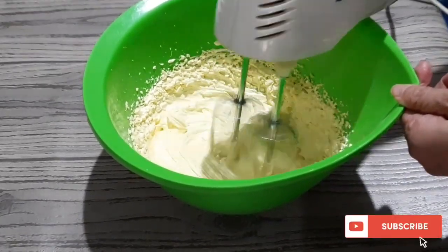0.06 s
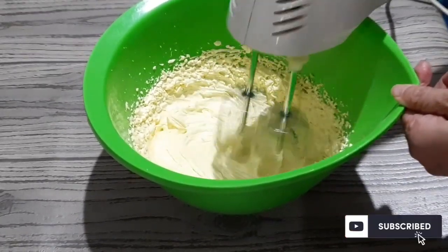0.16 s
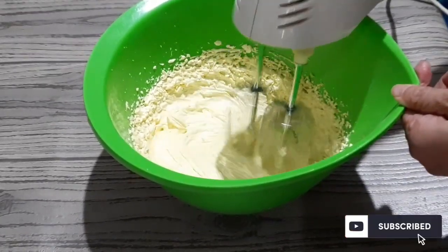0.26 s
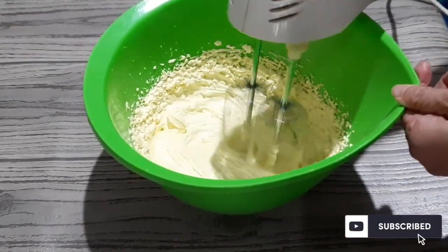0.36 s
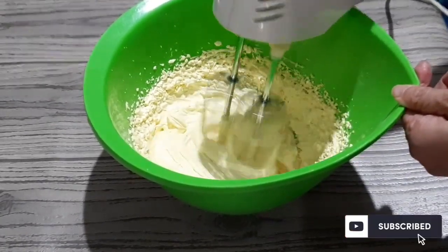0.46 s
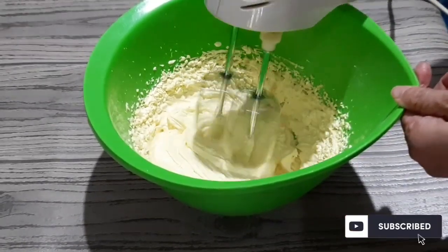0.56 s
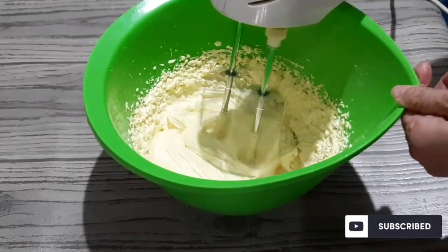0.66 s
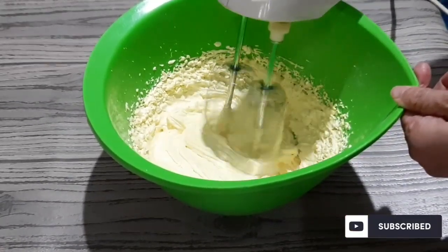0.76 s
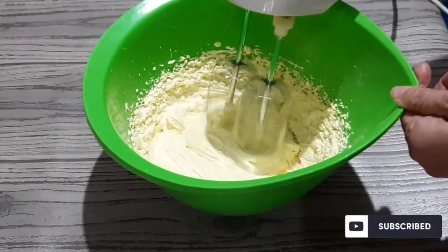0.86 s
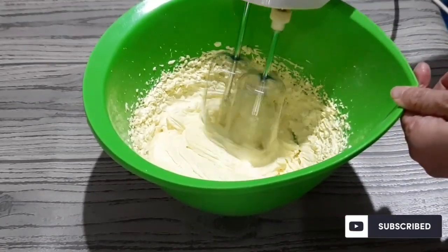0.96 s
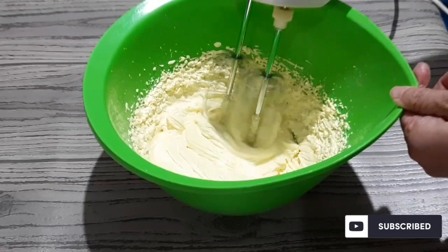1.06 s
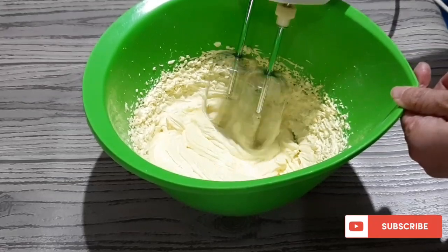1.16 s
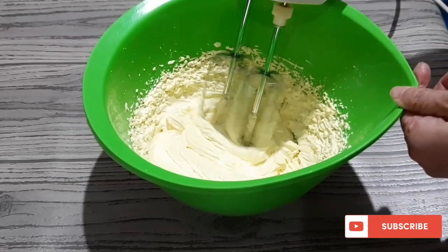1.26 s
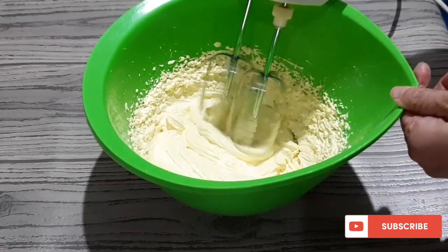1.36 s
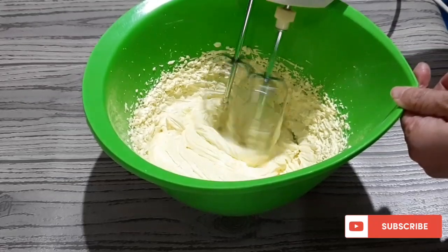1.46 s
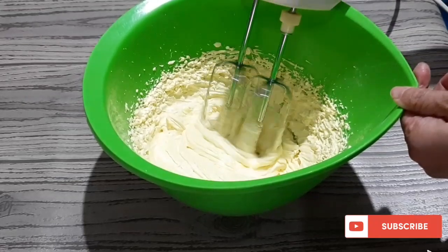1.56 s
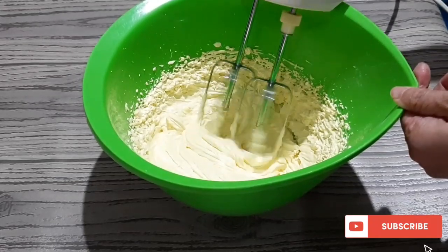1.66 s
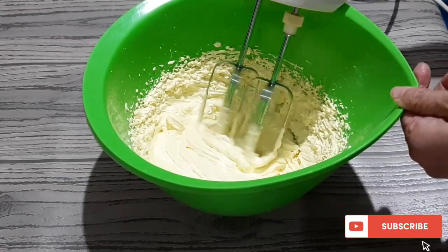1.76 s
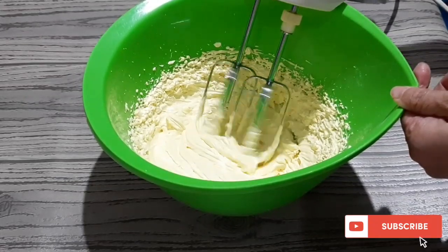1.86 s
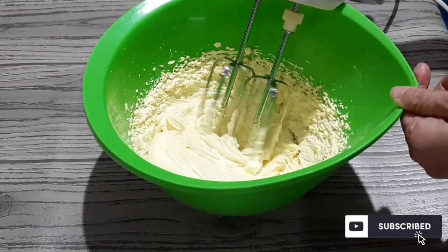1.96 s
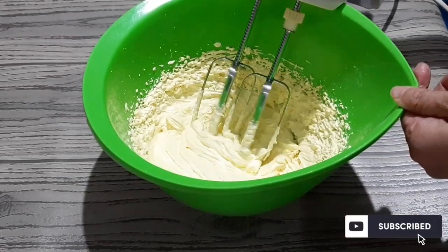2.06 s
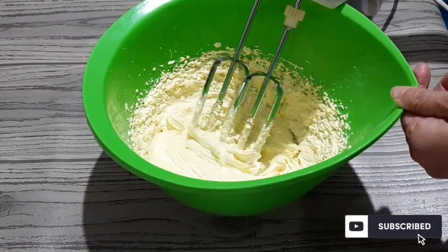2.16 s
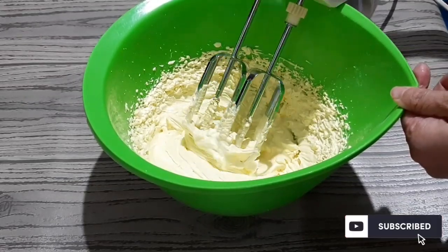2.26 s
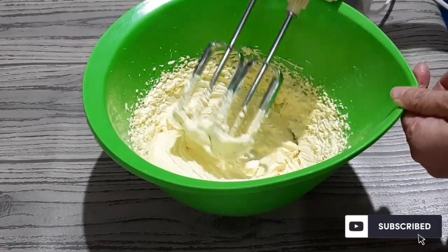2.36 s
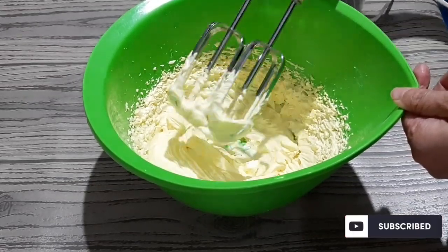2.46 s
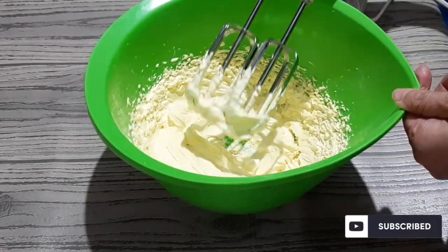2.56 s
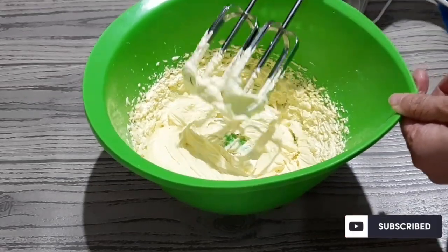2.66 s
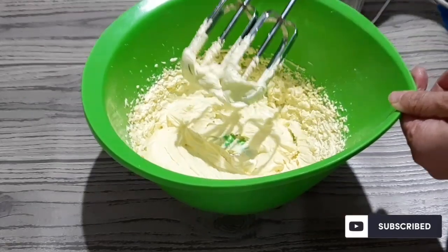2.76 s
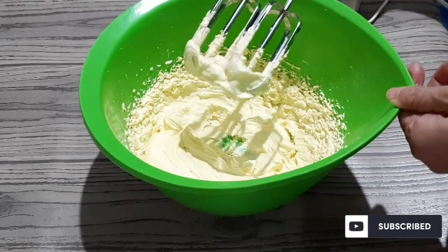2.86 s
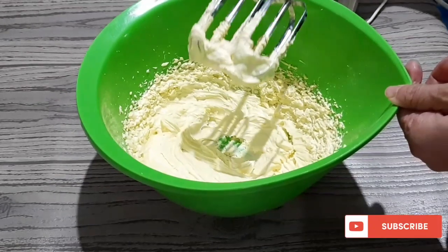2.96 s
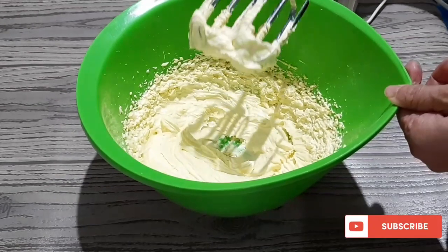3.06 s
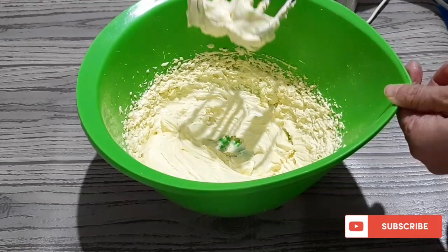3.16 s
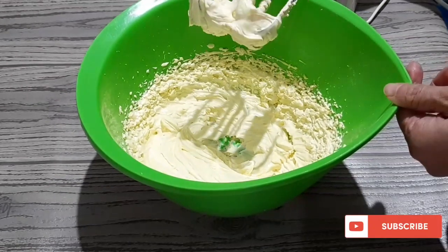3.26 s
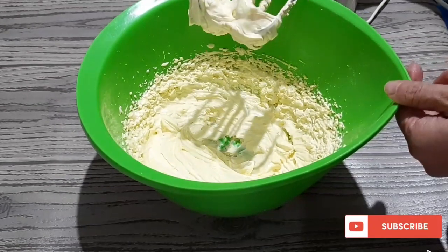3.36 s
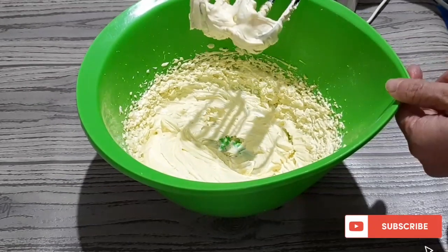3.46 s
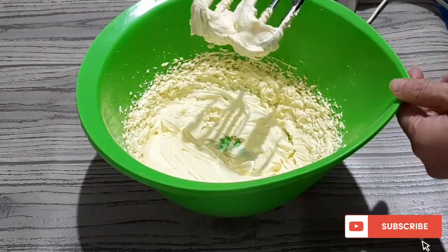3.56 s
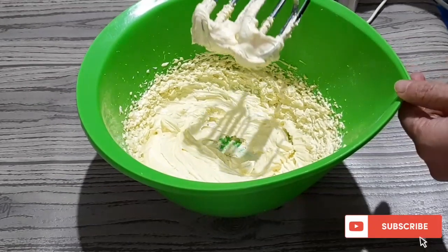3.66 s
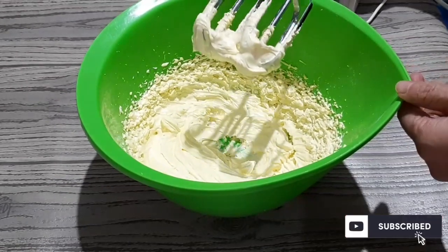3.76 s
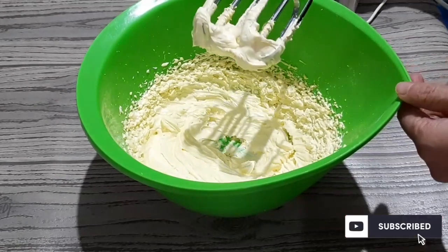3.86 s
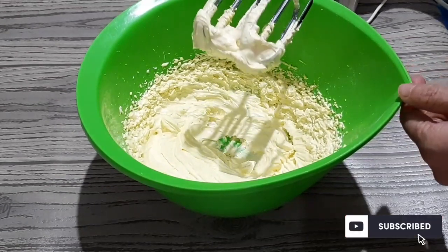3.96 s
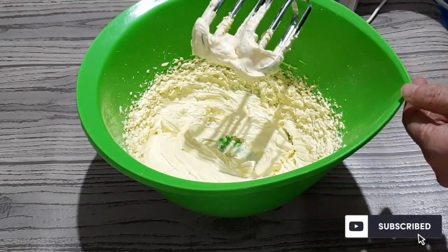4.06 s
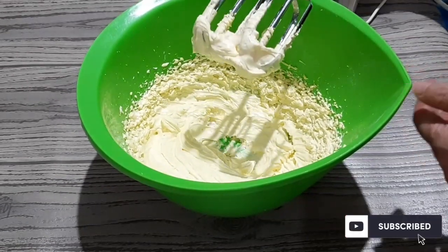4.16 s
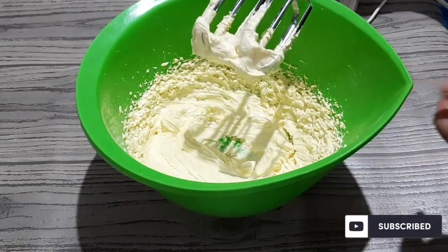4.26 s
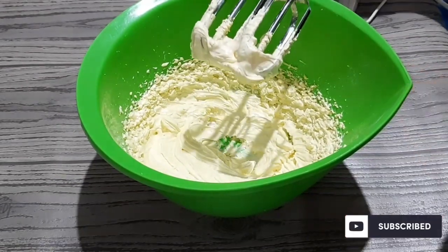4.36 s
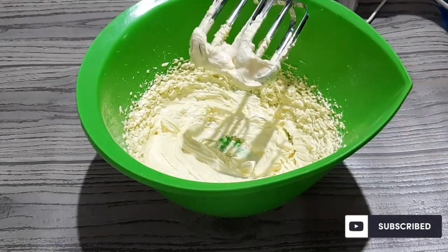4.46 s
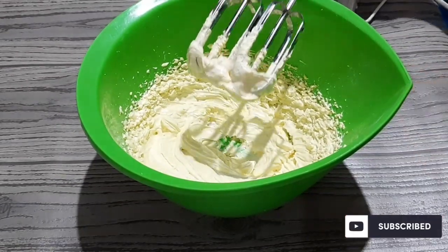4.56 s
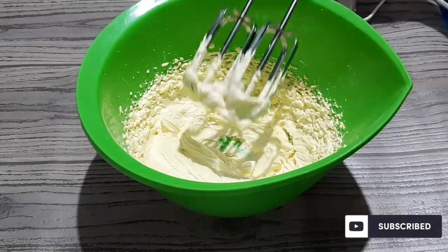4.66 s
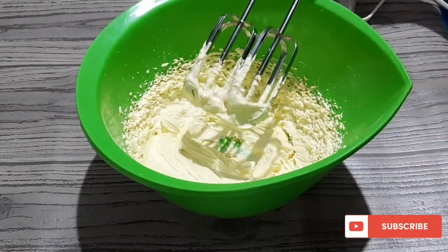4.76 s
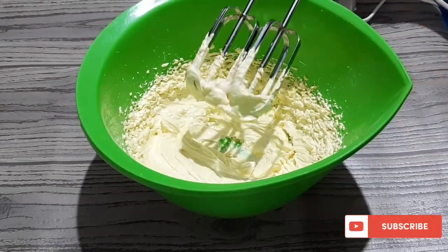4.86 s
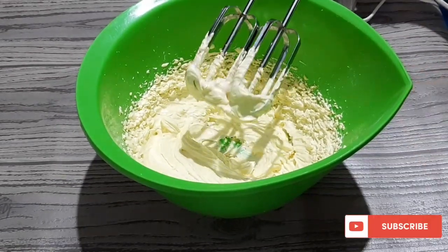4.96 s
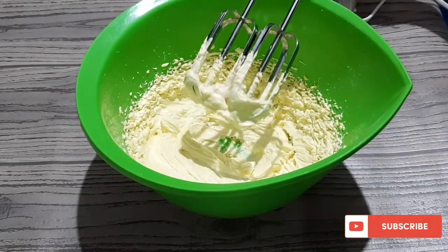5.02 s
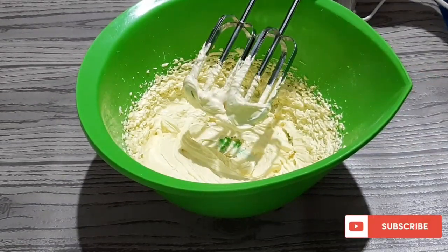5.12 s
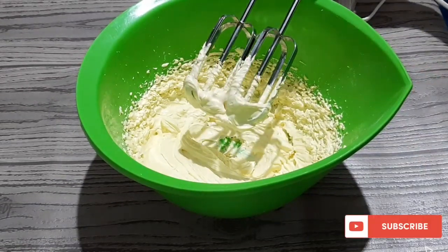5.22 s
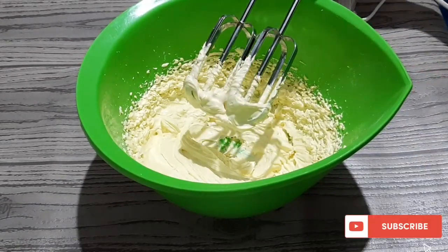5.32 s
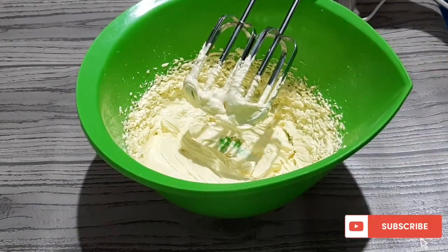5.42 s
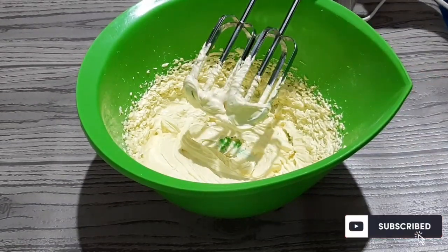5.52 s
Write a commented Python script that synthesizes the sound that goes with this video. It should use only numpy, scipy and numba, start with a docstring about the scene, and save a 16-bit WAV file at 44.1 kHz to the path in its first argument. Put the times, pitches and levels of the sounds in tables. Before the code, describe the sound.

A hand mixer already running at full speed rattles and hisses in a plastic bowl of batter, its blades drumming the wall. After about half a second it is switched off and its whine glides down over more than a second, knocks thinning out. Then the bowl ticks and creaks, and the mixer is set down with small thumps. Close phone microphone, quiet kitchen with short echoes.

```python
"""A hand mixer runs in a plastic bowl of batter, is switched off and coasts to rest, close to a phone in a kitchen.
Its commutator whines as gliding sines; gears rattle as clicks through housing resonances; fan and brushes hiss.
Beater blades strike the bowl as decaying modes and drum on it, and beater wires ping.
Then the bowl creaks and ticks on the table as the beaters are lifted, and the mixer is set down with thumps.
Short echoes surround these sounds, over smooth kitchen air with hums."""
import sys
import numpy as np
from scipy import signal
from scipy.fft import rfft, irfft
from scipy.io import wavfile
from scipy.ndimage import uniform_filter1d
from numba import njit

SR = 44100
rng = np.random.default_rng(int(sys.argv[2]) if len(sys.argv) > 2 else 0)


def volts(x):
    """Linear amplitude factor 10**(x/20) for a level x in dB, scalar or array-like."""
    e = np.asarray(x, float) / 20
    return 10 ** e


def unload_audio(sound):
    """Save the sound as a 16-bit wav file, at the path given as the first command line argument."""
    columns = np.transpose(np.atleast_2d(sound))
    # keep every value between -1 and 1, then stretch to whole-number steps
    steps = np.round(np.clip(columns, -1, 1) * 32767)
    wavfile.write(sys.argv[1], SR, steps.astype(np.int16))


N = 246519
TIME = np.arange(N) / SR

FULL_HZ = 4003  # commutator bars per second at the start
PASSES_PER_S = 45  # mean rate of blade passes
LAST_KNOCK_HZ = 330  # commutator rate below which the blades are too slow to knock

# modes of the bowl, t60 before damping: f/Hz, level/dB, t60/s
BOWL_MODES = [(344, -8, 0.074), (423.8, -1, 0.066), (520, 4, 0.04), (624, 4, 0.036), (810, -1.5, 0.0091),
              (1130, 8.5, 0.025), (1400, 7.5, 0.013), (1925, 7, 0.017), (2310, -2.5, 0.059),
              (2920, 7, 0.014), (3800, 9, 0.0063), (4520, 8.5, 0.016), (5100, -15, 0.029),
              (7220, -1.5, 0.02)]
# beaters pressed on the bowl: t/s, pressure/dB
PRESSURE = [(0, -1), (.19, 1), (.205, 8), (.4, 9), (.51, 4.5), (.535, 2), (.8, 2), (1.06, 0.5), (1.43, 1.5),
            (1.62, 2), (1.8, -1), (1.97, 1), (2.1, -1)]
# a small bowl sends out little bass: f/Hz, gain/dB
BOWL_RADIATION = [(60, -13.5), (200, -8), (330, -6), (15000, 1)]


def level(x, db):
    """Scale to an rms level."""
    return x * volts(db) / np.sqrt(np.mean(x ** 2))


def colour(x, points):
    """Weigh the spectrum of a sound by f/Hz, gain/dB points."""
    hz, db = np.transpose(points)
    bins = np.fft.rfftfreq(N, 1 / SR) + 1
    return irfft(rfft(x) * volts(np.interp(np.log(bins), np.log(hz), db)), N)


def resonate(x, hz, width):
    """One fixed resonance, gain 1 at the centre."""
    return signal.lfilter(*signal.iirpeak(hz, hz / width, SR), x)


@njit
def wander(x, hz, width):
    """A resonance whose centre moves; gain 1 at the centre."""
    y, band, low = np.empty(len(x)), 0., 0.
    for i in range(len(x)):
        g, k = np.tan(np.pi * hz[i] / SR), width / hz[i]
        v = (band + g * (x[i] - low)) / (1 + g * (g + k))
        band, low, y[i] = 2 * v - band, low + 2 * g * v, k * v
    return y


def walk(rate):
    """Random levels held 1 / rate s and slewed twice; spread near 1."""
    k = int(SR / rate)
    held = np.repeat(rng.standard_normal(N // k + 1), k)
    return 1.8 * uniform_filter1d(uniform_filter1d(held, k), k)[:N]


def clicks(per_s, spread_db):
    """Random clicks, a few much larger than the rest."""
    size = np.minimum(rng.exponential(size=N), 3.)
    return (rng.random(N) < per_s / SR) * rng.choice([-1., 1.], N) * volts(spread_db * size)


def ring(x, modes, damp):
    """A steady excitation through modes; a longer ring is a narrower, taller peak."""
    out = np.zeros(N)
    for k, (hz, db, t60) in enumerate(modes):
        width = damp * np.log(1000) / np.pi / t60
        out += (-1) ** k * volts(db) * np.sqrt(t60) * resonate(x, hz, width)
    return out


def blows(events, modes, favour_db, neutral_db, soft_ms, damp, crack_db, crack_ms):
    """Each blow snaps and rings the modes; its place favours one pitch, a soft contact is dull and swells slowly."""
    # spectrum of the contact snap: f/Hz, gain/dB
    snap_spectrum = [(200, -77), (700, -3), (1500, 0), (2500, -5), (4000, -14), (5500, -19), (8000, -30),
                     (15000, -35)]
    scatter_db = 2.5  # no two blows excite the modes alike
    hz, db, t60 = np.transpose(modes)
    t = np.arange(int(SR * t60.max() / damp))[:, None] / SR
    out, snaps = np.zeros(N + SR), np.zeros(N + SR)
    for s, peak_db, pitch_hz, treble_db in events:
        scatter, detune = rng.standard_normal((2, len(hz)))
        hardness = (treble_db - neutral_db) * np.clip(np.log2(hz / 700) / 1.47, 0, 1.2)
        favour = favour_db * np.exp(-(np.log2(hz / pitch_hz) / 0.32) ** 2)
        gain = np.sign(detune + .6) * volts(db + hardness + scatter_db * scatter + favour)
        rise = 1 - np.exp(-t * 1000 / (soft_ms * volts(neutral_db - treble_db)))
        decay = np.exp(-np.log(1000) * t * damp / t60)
        tone = np.sin(2 * np.pi * hz * (1 + 0.024 * detune) * t)
        wave = (gain * rise * decay * tone).sum(axis=1)
        at = slice(int(s * SR), int(s * SR) + len(t))
        out[at] += volts(peak_db) * wave / np.abs(wave).max()
        snaps[at] += volts(peak_db + treble_db + crack_db) * np.exp(-t[:, 0] * 1000 / crack_ms)
    return out[:N] + colour(snaps[:N] * rng.standard_normal(N), snap_spectrum)


def rate_hz():
    """Commutator bars per second: a slight sag under load, then an even run-down once switched off."""
    off_s, sag_hz_per_s, coast_hz_per_s = .445, 290, 2330
    sag = sag_hz_per_s * np.minimum(TIME, off_s)
    coast = coast_hz_per_s * np.maximum(TIME - off_s, 0)
    return np.maximum(FULL_HZ - sag - coast, 1e-3)


def slowed(db, loss_db):
    """A level at full speed that falls by loss_db for a tenth of the motor speed."""
    return db + loss_db * np.log10(rate_hz() / FULL_HZ)


def whine():
    """Commutator bars under the brushes sing a wavering tone and its multiples."""
    # relative level of whine multiples 1-4: level/dB
    multiples_db = [0, 0, -4, -7]
    # the housing lets the whine out where it resonates: f/Hz, level/dB
    outlet = [(2000, -66), (2900, -54), (3850, -58), (4000, -54), (4400, -66), (5500, -55), (5750, -49),
              (6050, -43), (6250, -38), (6400, -60), (6800, -48), (7100, -47), (7550, -43), (7790, -54),
              (7950, -44), (8150, -60), (9150, -60), (9500, -50), (9900, -49), (10300, -55), (11000, -62),
              (16000, -64)]
    hz, (path_hz, path_db) = rate_hz(), np.transpose(outlet)
    phase = 2 * np.pi * np.cumsum(hz * (1 + 0.0017 * walk(58.5))) / SR
    fade_db = -130 * np.clip(1 - hz / 2230, 0, 1)  # sinks away when slow
    out = np.zeros(N)
    for k, db in enumerate(multiples_db, 1):
        tone_db = db + fade_db + np.interp(k * hz, path_hz, path_db) + 3 * walk(40)
        out += np.sqrt(2) * volts(tone_db) * np.sin(k * phase)
    return out


def rattle(teeth):
    """Gear teeth click through wandering housing resonances, whose treble sinks with the speed."""
    # housing, level before the tilt: f/Hz, width/Hz, level/dB, further loss for a tenth of the speed/dB
    housing = [(95, 99, -46, 0), (1200, 190, 4, -4), (1420, 870, 18, -5), (1620, 150, 0, -5),
               (1900, 260, 11, -3), (2250, 160, 0, 0), (2550, 240, 2, 8), (2917, 50, 10, 68),
               (2950, 650, -3, 8), (3510, 300, -10, 0), (4360, 330, -8, -2), (5300, 400, -8, 0),
               (7400, 380, -7, 2)]
    # the plastic shell dulls the rattle: f/Hz, gain/dB
    shell = [(100, 0), (5500, 0), (8000, -6), (15000, -16)]
    tilt_db = np.maximum(slowed(19, 28), -12)  # dB per octave
    out = np.zeros(N)
    for k, (hz, width, db, loss_db) in enumerate(housing):
        centre = hz * (1 + 0.015 * min(width / 200, 1.5) * walk(7.9))
        bright_db = tilt_db * np.log2(max(hz, 1500) / 2000)
        flicker_db = 1.2 * walk(29.7) + min(250 / width, 2) * walk(14)  # narrow peaks waver more
        gain = volts(db + bright_db + flicker_db + slowed(0, loss_db))
        out += (-1) ** k * gain * wander(teeth, centre, 1. * width)
    press_db = np.interp(TIME, *np.transpose(PRESSURE))
    return level(colour(out, shell), 0) * volts(slowed(-18, 20) - 0.054 * press_db)


def shudder(teeth):
    """The housing shudders as the slowing motor passes its resonance."""
    # f/Hz, width/Hz, level before the speed window/dB, commutator rate/Hz, span of rate/Hz
    resonance = (1787, 418, -37.5, 3194, 525)
    hz, width, db, at_hz, span_hz = resonance
    sag = np.clip(rate_hz() / at_hz, .5, 2) ** 0.89  # its pitch sinks with the speed
    shaken = level(wander(teeth, hz * sag * (1 + 0.02 * walk(11.8)), 1. * width), db)
    return shaken * np.exp(-((rate_hz() - at_hz) / span_hz) ** 2) * volts(1.9 * walk(25.2))


def hiss(load):
    """Noise of fan and brushes that swells with the load, with a thin top to the brush hiss."""
    # body of the hiss: f/Hz, relative level per Hz/dB
    body = [(35, -50), (60, -18), (100, -15), (183, -16.5), (291, 0), (953, -3.5), (1150, -21),
            (1320, -5.5), (1910, -4.5), (3580, -4.5), (7720, -15.5), (10200, -26), (15500, -26.5)]
    # thin top of the brush hiss: f/Hz, relative level per Hz/dB
    top = [(5000, -30), (8000, -6), (11000, 4), (14000, -3), (15500, -10)]
    press_db = np.interp(TIME, *np.transpose(PRESSURE))
    rush = level(colour(rng.standard_normal(N) * load * volts(1.2 * walk(26.72)), body), 0)
    thin = level(colour(rng.standard_normal(N) * load, top), 0)
    return rush * volts(slowed(-28, 38.5) + 0.37 * press_db) + thin * volts(slowed(-53, 13))


def drum(hit):
    """Blades push softly and unevenly on the bowl; its two lowest modes boom under pressing beaters."""
    # weight of broad, soft pushes on the batter-filled bowl: f/Hz, gain/dB
    soft_push = [(200, -16), (340, 3), (420, 1), (540, -6.5), (700, -2.5), (1500, -17), (4000, -20)]
    press_db = np.interp(TIME, *np.transpose(PRESSURE))
    pushes = level(hit, -5.0) + level(clicks(900, spread_db=2.5), 0)
    broad = ring(colour(pushes, soft_push), BOWL_MODES, damp=1.0)
    low = level(hit, 0) + level(clicks(1500, spread_db=0.5), -1)
    boom = ring(low, BOWL_MODES[:2], damp=1.0)
    return (level(broad, 0) * volts(slowed(-37.5, 10) + press_db)
            + level(boom, 0) * volts(slowed(-45, 10) + 2.1 * press_db))


def chatter():
    """Loose beaters chatter on the bowl wall in unevenly dense clicks, until the motor is too slow."""
    # contact spectrum: f/Hz, gain/dB
    contact = [(500, -25), (900, 0), (1300, 0.5), (2000, 0.5), (2600, -10.5), (4500, -13), (7000, -30)]
    bursts = colour(clicks(450 * volts(5 * walk(30)), spread_db=4.0), contact)
    fade = np.clip(rate_hz() / LAST_KNOCK_HZ - .5, 0, 1)
    return level(ring(bursts, BOWL_MODES, damp=1.6), 0) * volts(slowed(-38, 7.5)) * fade


def mixer():
    """Gears, fan, brushes and blades; every uneven blade pass loads the gears, so rattle and hiss swell with it."""
    turn = np.cumsum(PASSES_PER_S * (1 + 0.089 * walk(30))) / SR
    hit = np.diff(np.floor(turn), prepend=0) * volts(0.19 * rng.standard_normal(N))
    load = 1 + .4 * np.exp(-(turn % 1) / .3)
    speed = rate_hz() / FULL_HZ
    teeth = clicks(3500 * speed + 1000, spread_db=8.0) * load ** (2 - speed)  # slower gears tick apart
    return whine() + rattle(teeth) + shudder(teeth) + hiss(load) + drum(hit) + chatter()


def knocks():
    """More blade strikes at uneven moments, low or high on the wall, weaker and duller as the motor slows."""
    gap, strength, height, bright = rng.random((120, 4)).T
    s = np.cumsum(.4 + 1.2 * gap) / PASSES_PER_S
    at = np.minimum((s * SR).astype(int), N - 1)
    press_db = np.interp(s, *np.transpose(PRESSURE))
    peak_db = slowed(-18, 8.5)[at] + 0.13 * press_db + 6 * (strength - .5)
    treble_db = slowed(-11.5, 6.3)[at] + 7 * (bright - .5)
    events = np.transpose([s, peak_db, 370 * 6.2 ** height, treble_db])
    return events[rate_hz()[at] > LAST_KNOCK_HZ]


def strikes():
    """Blades strike the bowl and ring its modes, which batter damps."""
    # single blade strikes, hard and light: t/s, peak of the ringing before radiation/dB,
    # favoured pitch f/Hz, treble/dB
    single = [(0.021, -11.5, 1200, -8), (0.0536, -5, 1950, -19), (0.0871, -13, 1230, -2),
              (0.2015, -7.5, 448, -16), (0.218, -7.5, 425, -9), (0.2335, -5.5, 425, -6.5),
              (0.2595, -8, 425, -10), (0.276, -10, 425, -24), (0.3095, -8, 433, -13),
              (0.3275, -6.5, 418, -9.5), (0.342, -16, 424, -24), (0.3593, -8.5, 420, -6.5),
              (0.371, -11, 424, -27), (0.3908, -10.5, 387, -19), (0.412, -21, 390, -19),
              (0.425, -19, 426, -28), (0.458, -18, 430, -26), (0.476, -20, 430, -22),
              (0.4917, -13, 430, -15), (0.508, -22, 430, -20), (0.585, -14.5, 2200, -12),
              (0.7073, -9, 378, -13.5), (0.7639, -15, 1800, -11), (0.8865, -27, 744, -15),
              (0.9934, -35, 1110, -28), (1.1077, -10.5, 1230, -15), (1.1758, -17.5, 2900, -13),
              (1.1991, -13, 2880, -19), (1.2224, -19, 454, -18), (1.2568, -18, 1280, -3.5),
              (1.3013, -12, 660, -8), (1.277, -17, 1260, -31), (1.346, -13, 1000, -17),
              (1.3659, -14.5, 2900, -16), (1.406, -13.5, 490, -7), (1.4218, -16.5, 440, -7.5),
              (1.5001, -14.5, 1300, -11), (1.506, -20, 1300, -11), (1.5341, -15, 1300, -12),
              (1.561, -16.5, 1410, -13), (1.589, -22, 1300, -25), (1.6205, -10, 1300, -15),
              (1.648, -18, 1200, -17), (1.66, -24, 1260, -6), (1.6933, -14, 1300, -20),
              (1.712, -20.5, 1900, -17), (1.738, -28, 520, -18), (1.754, -22, 1200, -16),
              (1.764, -22.5, 1900, -17), (1.774, -22, 1900, -16), (1.8, -15.5, 1200, -13),
              (1.809, -20.5, 1230, -16), (1.8472, -23.5, 1220, -10), (1.907, -27, 1900, -10),
              (1.941, -24, 452, -14), (1.956, -23, 443, -14)]
    struck = blows(single + list(knocks()), BOWL_MODES, favour_db=14, neutral_db=-9.5, soft_ms=0.072,
                   damp=2.26, crack_db=12, crack_ms=4.2)
    return colour(struck, BOWL_RADIATION)


def pings():
    """Beater wires touch each other and ring briefly at high pitches."""
    # modes of the wires, t60 before damping: f/Hz, level/dB, t60/s
    wires = [(4560, -7, .015), (5200, -4, 0.021), (6700, -7, .022), (7400, -2, 0.023)]
    # touches: t/s, peak of the ringing/dB, favoured pitch f/Hz, treble/dB
    touches = [(.826, -29.5, 6700, -10), (1.081, -29.5, 6700, -10), (1.127, -34, 5200, -10),
               (1.176, -34, 5200, -10), (1.255, -26, 5200, -12), (1.302, -36, 7400, -3),
               (1.32, -32.5, 7400, -5), (1.365, -32, 5200, -10), (1.503, -31, 4560, -10),
               (1.538, -36, 5200, -12), (1.808, -47, 7400, -10), (1.905, -43, 7400, -10),
               (1.917, -46, 7400, -10), (2.032, -41, 7400, -7)]
    return blows(touches, wires, favour_db=26, neutral_db=-7, soft_ms=.4, damp=0.69, crack_db=-6, crack_ms=3.0)


def taps():
    """The bowl at rest ticks and knocks, ringing longer than under the blades."""
    # t/s, peak of the ringing before radiation/dB, favoured pitch f/Hz, treble/dB
    ticks = [(2.031, -26.5, 380, -9.5), (2.128, -38, 393, -18), (2.174, -28, 547, -34),
             (2.346, -32, 550, -39), (2.436, -46, 603, -9), (2.529, -34, 424, -20), (2.646, -25, 646, -12),
             (2.682, -14.5, 563, -20), (2.689, -26, 520, -30), (2.696, -20, 573, -30),
             (2.716, -30, 596, -31), (2.727, -26, 560, -27), (2.757, -34.5, 620, -22),
             (2.775, -32.5, 520, -39), (2.789, -34.5, 590, -12), (2.8, -38, 477, -37),
             (2.852, -24, 654, -28), (2.91, -38, 560, -36), (2.975, -41, 620, -14), (2.994, -38, 620, -17),
             (3.013, -37, 615, -25), (3.029, -40, 1130, -23), (3.046, -36, 620, -31),
             (3.076, -39, 570, -13), (3.091, -38, 620, -20), (3.102, -39, 1130, -14),
             (3.14, -39, 1925, -10), (3.15, -39, 560, -15), (3.188, -38, 1130, -20), (3.22, -29, 530, -29),
             (3.376, -28, 562, -33), (3.463, -34.5, 530, -37)]
    tapped = blows(ticks, BOWL_MODES, favour_db=19, neutral_db=-16.5, soft_ms=0.27,
                   damp=1.6, crack_db=12.0, crack_ms=7.9)
    return colour(tapped, BOWL_RADIATION)


def rub():
    """Rubbing as dense small clicks through the bowl modes: dull pushes, and a finer rasp in the upper modes."""
    # rubbing sounds and one swell: the bowl sliding on the table, a faint low hum swelling at 4.4 s, scuffs
    # after the # set-down thumps: start t/s, length/s, push level/dB, rasp level/dB
    rubs = [(2.02, 0.2, -53.5, -80), (2.377, 0.24, -56, -71), (2.65, 0.2, -52, -67),
            (2.964, 0.37, -57, -64.5), (3.382, 0.28, -68, -70.5), (4.402, 0.317, -65, -96),
            (4.849, 0.086, -60, -74), (5.187, 0.069, -63, -66)]
    # fine rasp: f/Hz, gain/dB
    fine_rasp = [(500, -35), (900, -7), (1150, -7), (1900, 10), (2600, -5), (3800, 7), (6000, -26)]
    start, length, push_db, rasp_db = np.transpose(rubs)[:, :, None]
    gone = (TIME - start) / length
    edge = np.clip(np.minimum(gone, 1 - gone) * length / 0.0074, 0, 1)  # 7.4 ms fades
    shape = edge * volts(-1.5 * np.clip(gone - .5, -1, 1))  # each rub sinks by 1.5 dB
    grains = clicks(700 * volts(5.0 * walk(25)), spread_db=2.0)
    blunt = uniform_filter1d(uniform_filter1d(grains, 24), 24)
    push = colour(ring(blunt, BOWL_MODES, damp=0.96), BOWL_RADIATION)
    rasp = ring(colour(grains, fine_rasp), BOWL_MODES, damp=1.0)
    push_shape, rasp_shape = (shape * volts(push_db)).sum(axis=0), (shape * volts(rasp_db)).sum(axis=0)
    return push_shape * level(push, 0) + rasp_shape * level(rasp, 0)


def set_down():
    """The mixer's contacts ring the modes of table top and mixer body."""
    # table top and mixer body, t60 before damping: f/Hz, level/dB, t60/s
    table_modes = [(105, 3, 0.11), (151, 8.5, 0.093), (225, 2.5, 0.069), (300, 8, 0.12), (367, 8.5, 0.051),
                   (490, 4, 0.088), (620, 8, 0.032), (740, 2.5, 0.036), (1000, -1, 0.039),
                   (1300, 1.5, 0.023), (1670, -1.5, 0.027), (2050, 0, 0.021), (2380, -7, 0.03),
                   (3330, -40, 0.015), (4550, -4, 0.028)]
    # contacts: t/s, peak of the ringing before radiation/dB, favoured pitch f/Hz, treble/dB
    thumps = [(2.858, -37, 105, -12), (4.8215, -40, 2050, -9), (4.8282, -24, 2050, -7),
              (4.8345, -22.5, 490, -8), (4.841, -26, 455, -14), (4.8445, -35, 1300, -18),
              (4.8535, -33, 4550, -6.5), (4.873, -44, 367, -12), (4.89, -46, 225, -14),
              (4.915, -41, 490, -20), (4.935, -51, 367, -18), (5.172, -48, 225, -24),
              (5.19, -35.5, 1300, -7), (5.1915, -37.5, 477, -17), (5.205, -41, 300, -24),
              (5.225, -43, 225, -24)]
    # the table sends out no deep bass: f/Hz, gain/dB
    table_radiation = [(40, -18), (90, 0), (15000, 0)]
    landed = blows(thumps, table_modes, favour_db=12.0, neutral_db=-11.5, soft_ms=0.3,
                   damp=1.18, crack_db=4.0, crack_ms=5.7)
    return colour(landed, table_radiation)


def echo(x, t60, db):
    """Reflections as a decaying noise tail of given energy."""
    t = np.arange(int(.4 * SR)) / SR
    tail = rng.standard_normal(len(t)) * 1000 ** (-t / t60)
    return signal.fftconvolve(x, tail * volts(db) / np.sqrt(np.sum(tail ** 2)))[:N]


def reflections(near):
    """Table and wall reflections; early ones differ at the two ports and shift as hand and mixer move."""
    # weight of the side signal of near sounds: f/Hz, side minus mid/dB
    near_side = [(60, -23), (110, -17), (200, -12), (380, -15.5), (700, -8), (1290, -10.5), (2380, -11),
                 (4400, -6.5), (8120, -5), (15000, -1.5)]
    mid = near + echo(near, t60=0.51, db=-10.5)
    sway = 2.77 * walk(6)  # radians between two early patterns
    early = np.cos(sway) * echo(near, t60=0.02, db=-3.0) + np.sin(sway) * echo(near, t60=0.028, db=5.0)
    side = colour(early + echo(near, t60=0.33, db=-3.5), near_side)
    return mid + side * np.array([[1], [-1]])


def kitchen():
    """Smooth noise of room air, nearly alike left and right at 110-200 Hz, with a few central hums."""
    # room air: f/Hz, relative level per Hz/dB
    air = [(25, -32), (60, -14), (105, 0), (200, -2), (270, -4.5), (420, -5), (600, -8), (850, -9),
           (1250, -17.5), (1700, -12), (4000, -13), (5500, -16), (7600, -16), (8600, -23.5), (13000, -24.5),
           (15500, -38)]
    # weight of the side signal of the air: f/Hz, side minus mid/dB
    far_side = [(60, -1), (110, -16), (200, -17), (380, -5), (700, -5.5), (1290, 4.5), (2380, 0),
                (4400, 0.5), (8120, -0.5), (15000, 0)]
    # distant machines: f/Hz, width/Hz, level/dB
    machines = [(118.5, 28, -92), (530, 66, -68)]
    # steady hum of a distant compressor: f/Hz, level/dB
    compressor = [(150.7, -73), (301.5, -69)]
    mid = level(colour(rng.standard_normal(N), air), 0) * volts(-58 + 0.27 * walk(2.84))
    side = colour(level(colour(rng.standard_normal(N), air), -58), far_side)
    for hz, width, db in machines:
        mid += level(resonate(rng.standard_normal(N), hz, width), db) * volts(0.35 * walk(3.55))
    for hz, db in compressor:
        phase = 2 * np.pi * np.cumsum(hz * (1 + 0.00378 * walk(3.1))) / SR
        mid += np.sqrt(2) * volts(db + 2.0 * walk(3.88)) * np.sin(phase)
    return mid + side * np.array([[1], [-1]])


def scene():
    """Near sounds with table and wall reflections over the kitchen air."""
    near = mixer() + strikes() + pings() + taps() + rub() + set_down()
    return reflections(near) + kitchen()


def roll_off(x):
    """The treble ends steeply here."""
    return signal.sosfilt(signal.butter(12, 15910, fs=SR, output="sos"), x)


def record(dry):
    """The phone's microphone loses the deep bass and the very top at both ports."""
    # microphone response: f/Hz, gain/dB
    microphone = [(10, -30), (40, -10), (90, 0), (15300, 0), (15600, -40), (22050, -60)]
    heard = np.array([colour(port, microphone) for port in dry])
    return roll_off(heard)


dry = scene()
out = record(dry)
unload_audio(out)
```